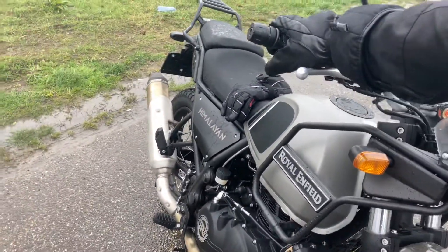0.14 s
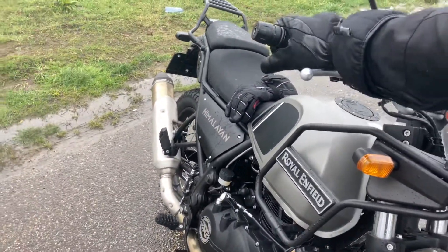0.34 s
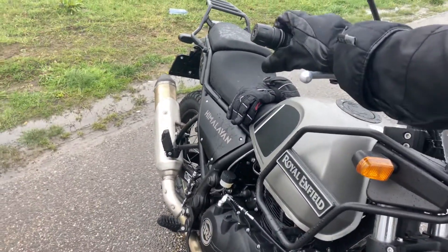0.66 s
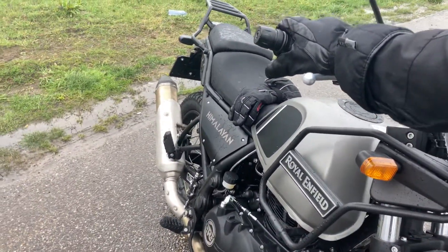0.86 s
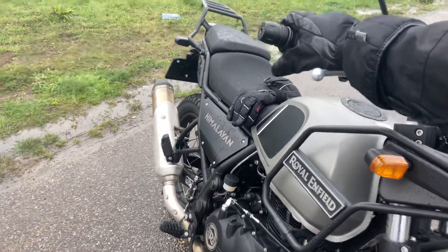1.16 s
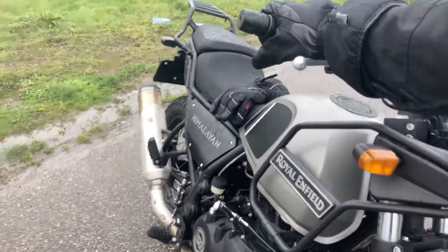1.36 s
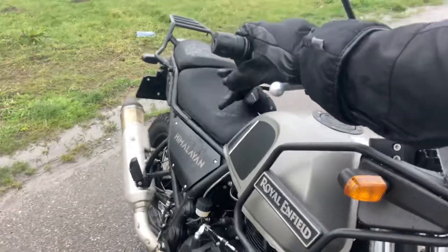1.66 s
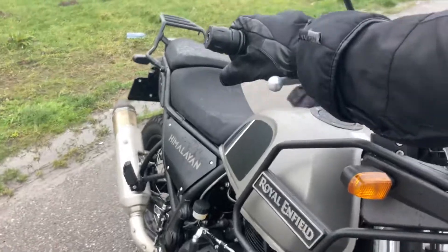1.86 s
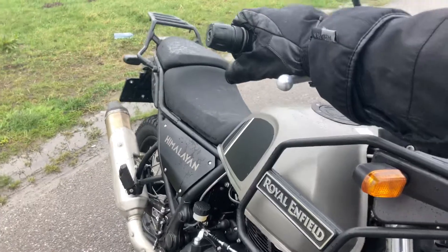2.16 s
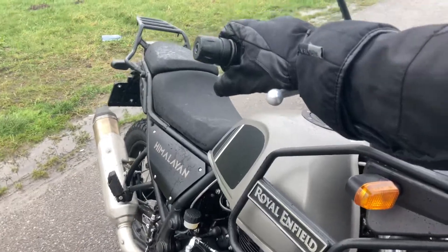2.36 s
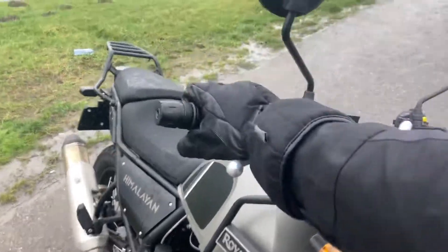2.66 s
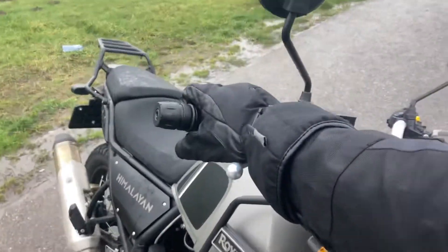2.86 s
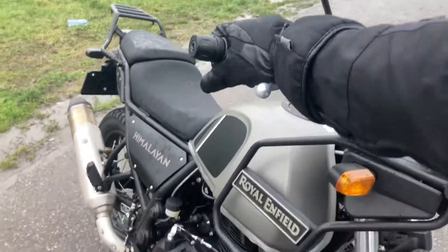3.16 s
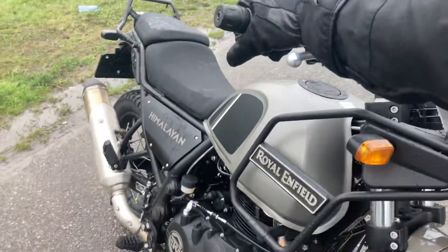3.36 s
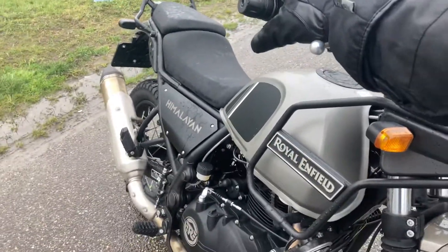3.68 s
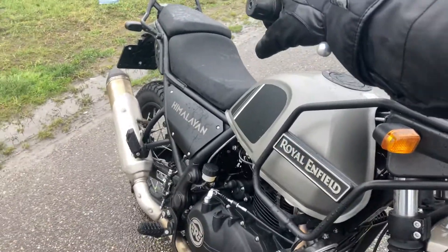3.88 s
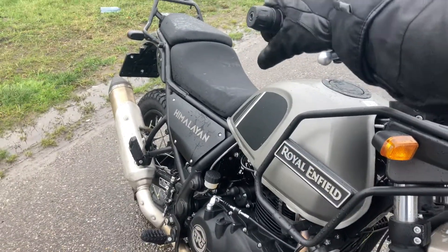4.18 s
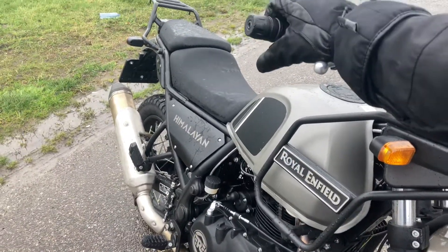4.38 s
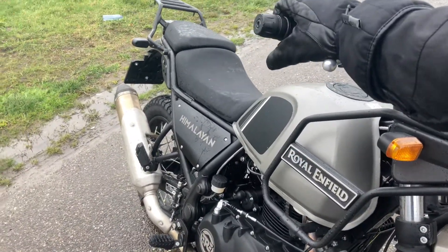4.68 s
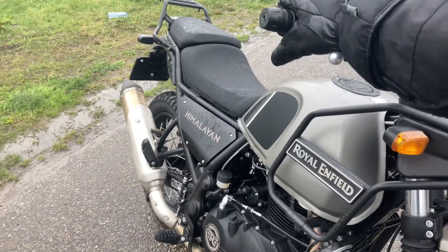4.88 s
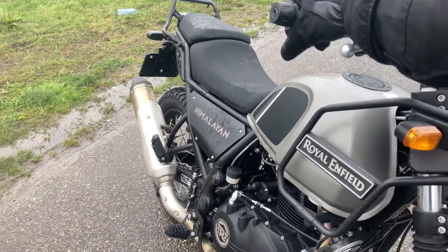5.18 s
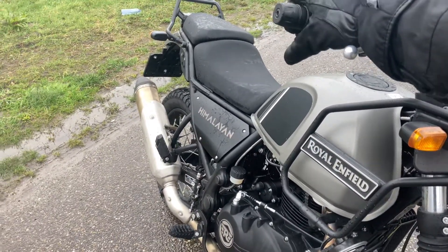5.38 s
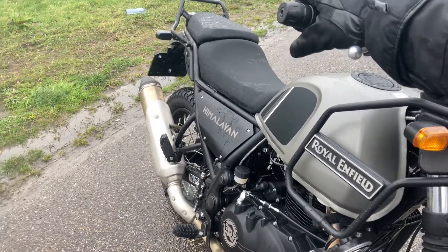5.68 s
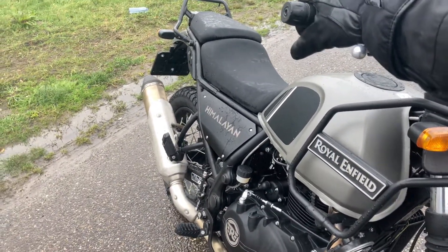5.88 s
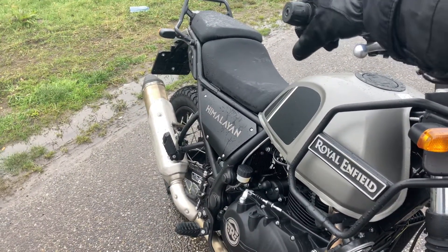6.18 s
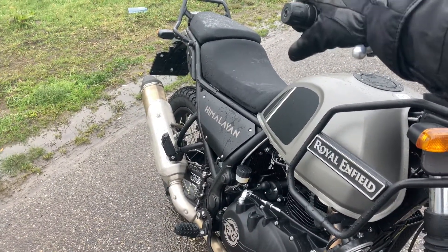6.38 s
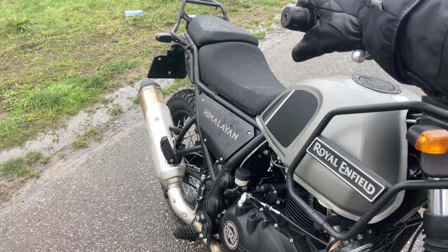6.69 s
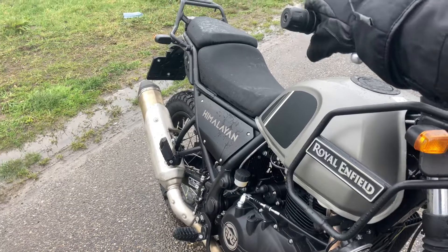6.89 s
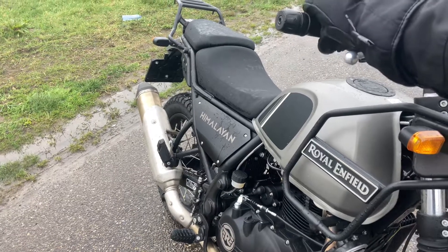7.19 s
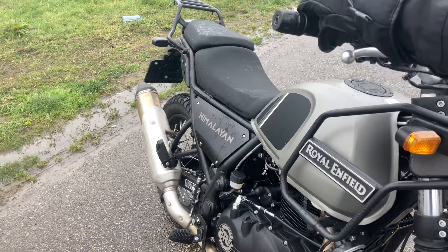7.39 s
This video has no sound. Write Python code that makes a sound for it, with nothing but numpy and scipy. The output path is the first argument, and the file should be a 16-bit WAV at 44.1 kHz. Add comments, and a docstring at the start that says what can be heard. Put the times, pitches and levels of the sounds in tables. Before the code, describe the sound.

Outdoors, close to a single-cylinder motorcycle, an engine thumps and clatters after an opening throttle blip. Strong wind thuds, tears and crackles on the microphone for about three seconds. Then the engine stands clear: five more blips, each a quick swelling growl with an intake honk, falling back to a lumpy beat with hollow exhaust pops, metallic knocks and weak later gusts.

```python
"""Single-cylinder motorcycle blipped in gusty wind

A motorcycle idles close to a stereo microphone, and its throttle is blipped six times.
Gas pulses beat in the silencer and ring the header pipe; the intake honks under throttle.
Filtered noise gated by the engine cycle makes the valve train clack and rasp; short bursts make pops.
Wind thuds, tears and crackles at the microphone for some three seconds, then returns in weaker gusts."""
import sys
import numpy as np
from scipy import signal
from scipy.fft import rfft, irfft
from scipy.io import wavfile
from scipy.ndimage import uniform_filter1d

SR = 44100
rng = np.random.default_rng(int(sys.argv[2]) if len(sys.argv) > 2 else 0)


def output_pcm(signal):
    """Save a mono or channel-first signal as 16-bit PCM at the path in sys.argv[1].

    Samples are clipped to [-1, 1] before scaling.
    """
    pcm = np.clip(np.atleast_2d(signal).T, -1, 1) * 32767
    wavfile.write(sys.argv[1], SR, np.round(pcm).astype(np.int16))


N = 332514
TIME, BINS = np.arange(N) / SR, np.fft.rfftfreq(N, 1 / SR)

# Blips of the throttle. Each row: start in seconds, length of the opening in seconds, firing rate
# pushed in before friction in Hz, relative intake draw in dB, force of the exhaust beat in dB.
BLIPS = [(.303, .29, 21.05, -2, 1), (3.081, 0.48, 29.36, -7, -6), (3.8821, 0.4, 24.24, -7, -3),
         (4.9617, 0.46, 27.66, -5, 0), (5.859, .5134, 26.34, -4, 0), (7.1189, 0.59, 28.5, -6.5, 0.5)]
# Mechanical knocks in one four-stroke cycle. Each row: place in cycles, spread in cycles,
# relative level on the cases in dB, relative level in the sizzle in dB.
KNOCKS = [(-.15, .1, -24, -16), (0, .05, -42, -16), (.43, 0.027, -12, -39)]
# Resonances of the engine cases. Each row: frequency in Hz, width in Hz, peak in dB.
CASE_MODES = [(1017, 77, 13.5), (1295, 30, 14.5), (1442, 52, 15), (1760, 34, 15), (1904, 40, 1),
              (3300, 61, 10.5), (7360, 110, 6.5), (9750, 330, 7)]
# Spectrum of the bright rasp. Each row: frequency in Hz, relative level in dB.
SIZZLE_SPECTRUM = [(1000, -6), (3000, 10), (5000, -1), (5700, 3.5), (6200, 3.5), (6600, -8.5), (7250, 3),
                   (8000, 2.5), (9700, 1), (10800, 3.5), (12000, 0.5), (14200, 1.5), (16000, -12)]
# Wind at the two microphone ports. Each row: frequency in Hz, coherence from 0 to 1,
# phase by which left leads in radians, left over right in dB.
WIND_PORTS = [(0, 0.46, 0, 14.5), (278, 0.99, 0, -5), (450, 0.7, 0.004, 1), (650, 0.021, 0, -1),
              (1090, 0.046, 0, 0.5), (2460, 0.22, 0.0043, -2.5), (5000, 0.037, 0, -0.5)]


def gain_of(db):
    """Level: an amplitude ratio is ten to the power of decibels over twenty."""
    return 10 ** (np.asarray(db) / 20)


def evened(x):
    """Normalization: scales a signal to rms 1."""
    return x / np.sqrt(np.mean(x ** 2) + 1e-20)


def curve(rows, at=TIME):
    """Linear interpolation: joins table rows by straight lines, one array a column."""
    key, *columns = np.transpose(rows)
    return [np.interp(at, key, c) for c in columns]


def colour(x, points, modes=(), size=16384):
    """Minimum phase: a causal filter follows from its magnitude spectrum by way of the cepstrum."""
    bins = np.fft.rfftfreq(size, 1 / SR)
    hz, db = np.transpose(points)
    db = np.interp(np.log(bins + 1), np.log(hz), db)
    for centre, width, peak_db in modes:
        db = db + peak_db / (1 + (2 * (bins - centre) / width) ** 2)
    cepstrum = irfft(np.log(gain_of(db)), size)
    # folding the second half onto the first makes the filter causal
    cepstrum[1:size // 2] *= 2
    cepstrum[size // 2 + 1:] = 0
    ring = irfft(np.exp(rfft(cepstrum)), size)[:size // 2]
    return signal.oaconvolve(np.atleast_2d(x), ring[None])[:, :N].reshape(x.shape)


def wander(hz, size=32768):
    """Band-limited fluctuation: smooth noise of rms 1 whose spectrum fades around hz."""
    step = N / SR / size
    fade = np.exp(-(np.fft.rfftfreq(size, step) / hz) ** 2)
    slow = irfft(rfft(rng.standard_normal(size)) * fade, size)
    return np.interp(TIME, np.arange(size) * step, evened(slow))


def noise():
    """Incoherence: two unrelated white noises."""
    return rng.standard_normal((2, N))


def ports(pair, table):
    """Coherence: blends two signals into partly alike left and right ports."""
    same, lead, tilt_db = curve(table, BINS)
    same = np.clip(same, 0, 1)
    a, b = rfft(pair)
    right = (same * a + np.sqrt(1 - same ** 2) * b) * np.exp(-1j * lead)
    return irfft(np.array([a * gain_of(tilt_db / 2), right * gain_of(-tilt_db / 2)]), N)


def bursts(rows, rise, decay):
    """Transient envelope: a fast rise and exponential decay (both s) for each row (s, peak dB)."""
    envelope = np.zeros(N)
    age = np.arange(SR // 4) / SR
    shape = (1 - np.exp(-age / rise)) * np.exp(-age / decay)
    for s, db in rows:
        part = envelope[round(s * SR):][:len(age)]
        part += gain_of(db) * shape[:len(part)] / shape.max()
    return envelope


def window(cycles, place, length):
    """Periodic gating: a Gaussian gate opens once a cycle."""
    return np.exp(-.5 * (((cycles - place + .5) % 1 - .5) / length) ** 2)


def firings(cycles, place, uneven_db):
    """Impulse excitation: one click a cycle, its strength wandering."""
    count = np.floor(cycles - place)
    return np.diff(count, prepend=count[0]) * gain_of(uneven_db * wander(60))


def controls():
    """Flywheel inertia: each throttle opening adds speed and air; friction drags it towards idle."""
    idle_hz, coast_s = 11.522, .8804  # firings per second; time constant of the slowing
    shut_db, draw_per_rev = -19, 1  # air past the shut throttle; dB of draw per dB of speed
    push, draw = np.zeros(N), gain_of(shut_db)
    for start, length, gained_hz, draw_db, _ in BLIPS:
        opening = np.sin(np.pi * np.clip((TIME - start) / length, 0, 1)) ** 2
        push = push + opening * 2 * gained_hz / length
        draw = draw + np.tanh(1.0 * opening) * gain_of(draw_db)
    speed = idle_hz + signal.lfilter([1 / SR], [1, -np.exp(-1 / (SR * coast_s))], push)
    revs_db = 20 * np.log10(speed / speed.mean())
    return speed, revs_db, 20 * np.log10(draw) + draw_per_rev * revs_db


def beat_db():
    """Load: the force of the exhaust beat passes steadily from the end of one blip to the next."""
    return curve([(start + length, force_db) for start, length, _, _, force_db in BLIPS])[0]


def exhaust(cycles, revs_db, throttle_db, db=-23.5, header_db=-33, place=0.014, swell_place=0.451,
            per_rev=0.57, header_per_rev=2.58, duck_db=-5):
    """Pulsed flow: harmonics of the firing rate fill the silencer; rough blow-downs ring the header."""
    # Smooth beat. Each row: multiple of the firing rate, relative level in dB.
    orders = [(1, -13), (2, -8.5), (3, 2), (4, -3), (5, -14)]
    # Silencer and header pipe. Each row: frequency in Hz, relative level in dB.
    silencer_spectrum = [(20, -8), (60, 1), (88, -1.5), (110, 6), (135, 0), (170, -1.5), (230, -8.5),
                         (600, -44)]
    header_spectrum = [(60, -23), (130, -15.5), (165, -2), (205, -9.5), (260, -2.5), (300, 0), (335, -5.5),
                       (380, 2.5), (430, -10), (490, -26), (595, -12.5), (700, -35), (1000, -12.5),
                       (1400, -48), (4000, -70)]
    jitter, rough, uneven_db = .004, .15, 1.4  # cycles; share of noise; strength of the beat in dB
    beat = sum(gain_of(order_db) * np.cos(2 * np.pi * round(k) * (cycles - swell_place))
               for k, order_db in orders)
    drone = evened(colour(beat * gain_of(uneven_db * wander(14)), silencer_spectrum))
    drone = drone * gain_of(db + per_rev * revs_db)
    clicks = evened(firings(cycles + jitter * wander(40), place, uneven_db=3.0))
    hiss = evened(noise()[0] * window(cycles, place + 0.23, 0.13))
    bark = evened(colour(clicks + rough * hiss, header_spectrum))
    bark = bark * gain_of(header_db + header_per_rev * revs_db)
    # an open throttle ducks the exhaust
    opened = np.clip(gain_of(throttle_db) / gain_of(-4), 0, 1)
    return (drone + bark) * gain_of(beat_db() + duck_db * opened)


def roar(cycles, revs_db, db=-37.0, per_rev=3.64, per_beat=2.7, loose=0.82, count=300):
    """Jet noise: gas roars louder with speed, in firing-rate gusts that partly repeat each cycle."""
    alike = rng.standard_normal((2, count))[:, (cycles % 1 * count).astype(int) % count]
    gas = alike + loose * evened(uniform_filter1d(noise(), size=5))
    gas = gas * (window(cycles, 0.62, 0.27) + 0.19)
    # Each row: frequency in Hz, relative level in dB.
    gas_spectrum = [(300, -18.5), (480, -15.5), (600, -3), (800, -1.5), (1030, -3), (1200, -8),
                    (1500, -22), (4000, -20.5)]
    return evened(colour(gas, gas_spectrum)) * gain_of(db + per_rev * revs_db + per_beat * beat_db())


def intake(cycles, throttle_db, db=-19.0, place=-0.025):
    """Cavity resonance: each gulp of air knocks the airbox and rushes past the throttle plate."""
    # Airbox. Each row: frequency in Hz, relative level in dB.
    airbox_spectrum = [(30, -22), (55, -3.5), (78, 3), (120, -15.5), (190, -16.5), (255, -6), (300, 5.5),
                       (345, -11), (395, -1), (500, -16.5), (640, -24), (1020, -18.5), (1300, -62.5),
                       (6000, -93)]
    rough = .35  # share of noise
    gulps = evened(firings(cycles, place, uneven_db=2.0))
    rush = evened(noise() * (window(cycles, place + 0.062, 0.16) + .5))
    return evened(colour(gulps + rough * rush, airbox_spectrum)) * gain_of(db + throttle_db)


def pops(db=-1, fizz=0.019):
    """Afterburning: unburnt fuel goes off in the pipe as a hollow knock with a short puff."""
    # Each row: time in seconds, relative level in dB.
    pop_times = [(3.718, -15.5), (4.379, -11.5), (4.49, -11.5), (4.516, -17), (4.544, -10.5), (4.743, -24),
                 (5.455, -12.5), (5.702, -9.5), (5.827, -9), (6.329, -7.5), (6.454, -4.5)]
    # Each row: frequency in Hz, relative level in dB.
    pop_spectrum = [(60, -16), (200, -9), (320, 8), (400, 1), (550, -25), (1000, -24), (3000, -15),
                    (6000, -22.5), (15000, -92)]
    clicks = np.zeros(N)
    for s, peak_db in pop_times:
        clicks[round(s * SR)] = gain_of(peak_db)
    puffs = fizz * noise() * bursts(pop_times, 0.003, 0.013)
    sound = colour(uniform_filter1d(clicks, size=24) + puffs, pop_spectrum)
    return gain_of(db) * sound * clicks.max() / abs(sound).max()


def gear_teeth(cycles, count=700):
    """Periodic roughness: tiny chain and gear knocks recur at the same places in every cycle."""
    tooth = (cycles % 1 * count).astype(int) % count
    return evened(rng.standard_normal((2, count))[:, tooth] * (np.diff(tooth, prepend=0) != 0))


def fins(x, size=3000):
    """Modal density: the cooling fins add a short ring of decaying noise."""
    decay_s, share = .007, .65
    ring = rng.standard_normal(size) * np.exp(-np.arange(size) / SR / decay_s)
    return x + share * signal.oaconvolve(x, ring[None] / np.linalg.norm(ring))[:, :N]


def clatter(cycles, revs_db, throttle_db, db=-32, per_rev=1.0, per_throttle=0.23, between=1.0):
    """Structure-borne sound: piston, chain and valves excite the cases, more with speed and load."""
    # Engine cases. Each row: frequency in Hz, relative level in dB.
    case_spectrum = [(100, -53), (300, -4.5), (500, -15), (700, -9), (880, 3), (1060, -3.5), (1200, -11.5),
                     (1800, -14.5), (2500, -7), (3400, -11), (5000, -14), (6500, -32), (12000, -35)]
    loose, flicker_db = .55, 1.6  # share of non-repeating rattle; flicker of its level
    gate = between + sum(gain_of(knock_db) * window(cycles, place, length)
                         for place, length, knock_db, _ in KNOCKS)
    knocks = (gear_teeth(cycles) + loose * noise()) * gate * gain_of(flicker_db * wander(74))
    rattle = evened(colour(fins(knocks), case_spectrum, CASE_MODES))
    return rattle * gain_of(db + per_rev * revs_db + per_throttle * throttle_db)


def strokes(cycles, revs_db, db=-35, per_rev=0.59, ring=0.74, slack=0.018):
    """Impact: tappets and piston slap the metal in short clacks of wandering strength, moment and pitch."""
    # Clacks in one cycle. Each row: place in cycles, relative level in dB.
    stroke_places = [(-.02, 0), (.09, -6), (.3, -11), (.5, -9), (.77, -8)]
    # Noise of a clack, then its ringing tones. Each row: frequency in Hz, relative level in dB.
    stroke_spectrum = [(500, -24), (1000, -3), (2300, 0), (3500, -5), (5000, -13), (6500, -28),
                       (12000, -45)]
    stroke_tones = [(1400, -1), (2300, 0.5), (3400, -8.5)]
    uneven_db, detune, decay_s = 2.8, .06, .0035  # detune: share of the pitch
    hits = sum(gain_of(stroke_db) * firings(cycles + slack * wander(32), place, uneven_db)
               for place, stroke_db in stroke_places)
    envelope = signal.lfilter([1], [1, -np.exp(-1 / (SR * decay_s))], hits)
    rings = np.zeros((2, N))
    for hz, ring_db in stroke_tones:
        pitch = hz * (1 + detune * np.array([wander(22), wander(20)]))
        rings += gain_of(ring_db) * np.sin(2 * np.pi * np.cumsum(pitch, axis=1) / SR)
    metal = evened(colour(noise(), stroke_spectrum)) + ring * evened(rings)
    return evened(metal * uniform_filter1d(envelope, size=90)) * gain_of(db + per_rev * revs_db)


def sizzle(cycles, revs_db, throttle_db, db=-34.0, per_rev=1.65, per_throttle=0.18, between=1.0):
    """Modulated noise: valve train and rushing air rasp in step with the cycle, by speed and load."""
    # Each row: time in seconds, relative treble level in dB.
    treble = [(0, 11), (.5, 5.5), (1.27, 6.5), (1.42, -5.5), (1.88, 7.5), (2.2, 1.5), (3.13, 2.5),
              (3.24, 3), (4.8, 3.5), (5.5, 4), (7.54, 5)]
    gate = between + sum(gain_of(knock_db) * window(cycles, place, length)
                         for place, length, _, knock_db in KNOCKS)
    flickering = noise() * gate * gain_of(1.96 * wander(100))
    rasp = evened(colour(flickering, SIZZLE_SPECTRUM, CASE_MODES))
    level_db = db + per_rev * revs_db + per_throttle * throttle_db + curve(treble)[0]
    return rasp * gain_of(level_db)


def clanks(db=1):
    """Damped resonance: a hard knock rings the cases for a moment."""
    # Each row: time in seconds, relative level in dB.
    clank_times = [(4.122, -18.5), (5.182, -21.5), (5.3, -16.5), (6.178, -13.5), (7.404, -21.5),
                   (7.43, -18.5)]
    # Each row: frequency in Hz, relative level in dB.
    clank_spectrum = [(200, -39), (650, 5.5), (1050, 2.5), (1350, 1), (1800, -16), (2400, -8), (6000, -24)]
    metal = evened(colour(noise(), clank_spectrum, [(1022, 130, 8.7)]))
    return gain_of(db) * metal * bursts(clank_times, 0.00082, 0.011)


def ticks(db=-3):
    """Broadband transients: short bright spits of noise."""
    # Each row: time in seconds, relative level in dB.
    tick_times = [(.4409, -19), (.4883, -18), (1.2765, -26), (1.297, -37), (1.308, -22.5), (1.3448, -22),
                  (1.3628, -23), (1.9689, -30), (3.266, -23.5), (3.313, -21.5), (3.353, -19), (3.384, -23),
                  (4.335, -20), (6.14, -24), (6.419, -22), (6.452, -24), (7.413, -26), (7.448, -17.5)]
    return gain_of(db) * evened(colour(noise(), SIZZLE_SPECTRUM)) * bursts(tick_times, 0.00052, 0.0031)


def crackles(db=3, rise=0.00027, decay=0.0043):
    """Overload: short sharp crackles of the microphone under hard gusts, as bursts of filtered noise."""
    # Each row: time in seconds, relative level in dB.
    crackle_times = [(.2852, -17), (.5164, -23), (.557, -24.5), (.62, -38), (1.0555, -26), (1.1693, -17.5),
                     (1.179, -19), (1.2072, -24), (1.221, -16), (1.228, -31), (1.254, -23), (1.2765, -20),
                     (1.2835, -16), (1.2965, -14), (1.3265, -18), (1.3449, -16), (1.3627, -23),
                     (1.779, -26), (1.9013, -15.5), (1.968, -19), (2.082, -22), (2.105, -22), (2.153, -42),
                     (2.232, -26), (2.324, -22), (2.5686, -29), (2.6, -30), (2.6424, -28), (2.796, -42)]
    # Each row: frequency in Hz, relative level in dB.
    crackle_spectrum = [(300, -20), (1000, 12.5), (2400, 4.5), (4300, -3), (6000, -15.5), (9000, -21.5),
                        (16000, -61)]
    return gain_of(db) * evened(colour(noise(), crackle_spectrum)) * bursts(crackle_times, rise, decay)


def buffets(thud_db=-2, slap_db=-6, tear_db=-1, cycles=0.87, sag=0.38):
    """Turbulent pressure: hard eddies thud in a few sinking swings, with a hollow slap and tearing top."""
    # Single buffets. Each row: time in seconds, middle pitch of the thud in Hz,
    # relative level of thud and slap in dB, relative level of the tearing top in dB.
    buffet_rows = [(0.01, 100, -9, -21.5), (0.099, 151, -10, -22), (0.119, 102, -7.5, -34),
                   (0.165, 73, -11, -18.5), (0.192, 158, -3.5, -22), (0.226, 126, -26, -16.5),
                   (0.242, 197, -4, -25), (0.285, 320, -6.5, -11), (0.318, 63, -7.5, -46),
                   (0.379, 95, -9, -20.5), (0.476, 75, -1.5, -12.5), (0.526, 72.4, -28, -21.5),
                   (0.558, 74, -7.5, -44), (0.617, 121, -3, -23), (0.778, 117, -18, -28),
                   (0.822, 104, -11.5, -26), (0.892, 79.5, -11, -23), (0.909, 75, -15, -31),
                   (0.94, 207, -10.5, -21), (1.054, 153, -6.5, -29), (1.104, 211, -2.5, -14.5),
                   (1.126, 72, -1.5, -26), (1.169, 447, -1.5, -23), (1.194, 118, -5, -17),
                   (1.22, 107, -7, -16), (1.317, 277, -21, -9.5), (1.34, 454, -10, -16),
                   (1.361, 67, -13, -10), (1.554, 108, -32, -23.5), (1.743, 90, -11, -42),
                   (1.778, 64, -10, -22), (1.812, 67, -6, -18), (1.905, 94, -5, -13),
                   (1.967, 91.5, -4, -14.5), (2.039, 260, -7, -17.5), (2.086, 115, -5.5, -18),
                   (2.153, 150, -9, -21), (2.175, 100, -8, -19.5), (2.236, 76, -9, -19.5),
                   (2.251, 335, -4, -29), (2.329, 289, -15, -29), (2.526, 138, -9, -24),
                   (2.573, 85, -22, -16.5), (2.598, 340, -10, -19), (2.623, 457, -9.5, -30),
                   (2.67, 65, -10, -24), (2.714, 205, -16, -28), (2.795, 98, -12.5, -40),
                   (2.963, 212, -14, -24), (3.077, 150, -16, -57), (3.67, 185, -20, -45),
                   (3.859, 99, -11.5, -36), (3.883, 142, -17, -42), (3.958, 64.5, -15.5, -34),
                   (4.156, 226, -8, -31), (4.199, 98, -12, -42), (4.282, 98, -19, -42),
                   (6.795, 180, -11.5, -46), (6.842, 117, -14, -45), (6.922, 110, -12.5, -36),
                   (6.935, 106, -14, -42), (6.963, 318, -13.5, -35), (7.011, 78.6, -16, -32),
                   (7.111, 124, -14.5, -34), (7.246, 112, -22, -47)]
    # Slap and tearing top. Each row: frequency in Hz, relative level in dB.
    slap_spectrum = [(100, -22), (230, 5.5), (350, 5), (560, 1), (800, -8), (2000, -50)]
    tear_spectrum = [(200, 5), (600, -2), (1000, 9), (1600, 5.5), (2400, -2.5), (3300, -13), (4500, -15.5),
                     (6000, -28), (9000, -29), (16000, -44)]
    thuds, age = np.zeros(N), np.arange(SR // 6) / SR
    for (s, hz, db, _), phase in zip(buffet_rows, rng.random(len(buffet_rows))):
        swell = age * hz / cycles  # reaches 1 at the loudest moment
        swings = np.cumsum(hz * (1 + sag * (np.exp(-swell / 2) - .5))) / SR
        thud = gain_of(db + thud_db) * swell * np.exp(1 - swell) * np.sin(2 * np.pi * (swings + phase))
        part = thuds[round(s * SR):][:len(age)]
        part += thud[:len(part)]
    tops = [(s, db + tear_db) for s, _, _, db in buffet_rows]
    slaps = [(s, db + slap_db) for s, _, db, _ in buffet_rows]
    torn = noise() * gain_of(5.1 * wander(900))
    tear = evened(colour(torn, tear_spectrum)) * bursts(tops, 0.00067, 0.017)
    slap = evened(colour(noise(), slap_spectrum)) * bursts(slaps, 0.00028, 0.013)
    return thuds + ports(slap + tear + crackles(), WIND_PORTS)


def gusting(calm_flutter_db=-12, flutter_per_db=1.02, size=8192):
    """Energy summation: gusts rise, hold and die away, adding in power to the breeze."""
    # Each row: start in seconds, length in seconds, relative rumble in dB, relative flutter in dB.
    gust_rows = [(-.03, 0.095, -14.5, -30.5), (0.109, 0.16, -9, -21), (0.436, 0.083, -9.5, -19),
                 (0.875, 0.23, -12.5, -25), (1.124, 0.18, -7.5, -18.5), (1.264, 0.18, -13, -17),
                 (1.784, 0.11, -13, -14), (2.133, 0.076, -17, -23), (2.23, 0.018, -8.5, -31),
                 (2.415, 0.079, -13.5, -23.5), (2.488, .08, -15, -21.5), (2.558, 0.086, -11.5, -19.5),
                 (3.607, 0.094, -24, -35), (4.052, 0.25, -18, -30.5), (6.815, 0.12, -17, -30.5),
                 (7.03, 0.16, -29, -55)]
    # Breeze between gusts. Each row: time in seconds, relative level in dB.
    breeze_rows = [(0, -17.5), (.65, -15), (1.05, -21), (1.7, -14), (2.6, -17), (3.05, -19), (3.3, -25.5),
                   (5.1, -28.5), (5.5, -26.5), (6.5, -25), (7.54, -27.5)]
    attack_s, release_s = 0.012, 0.065
    t = np.linspace(0, N / SR, size)
    breeze_db = curve(breeze_rows, t)[0]
    low, high = gain_of(breeze_db), gain_of(calm_flutter_db + flutter_per_db * breeze_db)
    for start, length, rumble_db, flutter_db in gust_rows:
        age = t - start
        shape = np.clip(age / attack_s, 0, 1) * np.exp(-np.maximum(age - length, 0) / release_s)
        low = np.hypot(low, shape * gain_of(rumble_db))
        high = np.hypot(high, shape * gain_of(flutter_db))
    return np.interp(TIME, t, low), np.interp(TIME, t, high)


def wind(rumble_db=-3, flutter_db=-1, lumpy_db=1.7, torn_db=1.0, ragged_db=3):
    """Turbulence: eddies strike the ports as a lumpy rumble and a flutter torn into shreds."""
    # Rumble and flutter. Each row: frequency in Hz, relative level in dB.
    rumble_spectrum = [(15, -44), (30, -33), (45, -4.5), (65, -3), (95, -3), (130, -4.5), (200, -8),
                       (300, -13), (500, -18.5), (1000, -76.5)]
    flutter_spectrum = [(60, -16), (150, 0.5), (300, 0.5), (450, 1), (600, 2.5), (750, -2), (1020, -2),
                        (1500, -7.5), (2300, -15.5), (3300, -23.5), (5000, -39.5), (8000, -42),
                        (16000, -113)]
    low, high = gusting()
    eddies = evened(gain_of(lumpy_db * wander(60.0)))
    rumble = evened(colour(noise() * eddies, rumble_spectrum)) * gain_of(rumble_db) * low
    shreds = noise() * eddies * gain_of(torn_db * wander(150) + ragged_db * wander(170))
    return rumble + evened(colour(shreds, flutter_spectrum)) * gain_of(flutter_db) * high


def scene(unsteady=0.00084):
    """Superposition: speed and throttle drive every part of the engine; the wind blows over it."""
    # Timing of the firings. Each row: time in seconds, lag in cycles.
    firing_lag = [(3.1, -.15), (3.35, .18), (3.53, .43), (3.88, .37), (4.15, 0), (4.3, .15), (4.6, .05),
                  (4.95, .2), (5.17, .12), (5.4, .27), (5.9, .17), (6.24, -.05), (6.42, .09), (6.75, .08),
                  (7.2, 0), (7.54, .42)]
    # The microphone nears the cylinder. Each row: time in seconds, gain of mechanical noise in dB.
    nearness = [(3.6, -6), (7, -4.5)]
    # Engine at the two ports. Each row: frequency in Hz, coherence from 0 to 1,
    # phase by which left leads in radians, left over right in dB.
    engine_ports = [(0, 0.63, -1, 7), (330, 0.57, -3, 24), (708, 1, 1.5, -0.5), (1118, 0.85, -1.5, -3),
                    (1990, 0.036, -0.33, 0.5), (2910, 0.67, -2.5, -0.5), (4670, 0.17, -5, 1),
                    (5160, 0.96, -5, 0.5), (7430, 1, 0, -2), (7300, 1, -2, 0.5), (14830, 1, 13.5, -0.5)]
    first_cycle = .23  # place in the cycle before lag and unsteadiness
    speed, revs_db, throttle_db = controls()
    cycles = first_cycle + np.cumsum(speed) / SR - curve(firing_lag)[0]
    cycles = cycles + unsteady * wander(19)  # the timing of the cycles wavers
    running = clatter(cycles, revs_db, throttle_db) + strokes(cycles, revs_db)
    running = running + roar(cycles, revs_db) + sizzle(cycles, revs_db, throttle_db)
    bright = running * gain_of(curve(nearness)[0]) + ticks() + clanks()
    deep = exhaust(cycles, revs_db, throttle_db) + intake(cycles, throttle_db) + pops()
    return deep + ports(bright, engine_ports) + ports(wind(), WIND_PORTS) + buffets()


def narrow_bass(x, slip_db=-1, octaves=0.38, order=6, size=2048):
    """Mid and side: below a sinking corner both channels are alike; around it they slip out of phase."""
    mono_hz, sink_from_s, sink_hz_per_s, lowest_hz = 498, 4.04, 149, 29.3
    slip_from_s, slip_rise_s = 5.03, 0.54
    hz, t, (left, right) = signal.stft(x, SR, nperseg=size, noverlap=size * 3 // 4)
    corner = np.clip(mono_hz - sink_hz_per_s * (t - sink_from_s), lowest_hz, mono_hz)
    slip = gain_of(slip_db) * np.clip((t - slip_from_s) / slip_rise_s, 0, 1)
    ratio = (hz[:, None] + 1) / corner
    mid, side = (left + right) / 2, (left - right) / 2
    near_corner = np.exp(-.5 * (np.log2(ratio) / octaves) ** 2)
    side = side / np.sqrt(1 + ratio ** (-2 * order)) + 1j * mid * slip * near_corner
    pair = np.array([mid + side, mid - side])
    return signal.istft(pair, SR, nperseg=size, noverlap=size * 3 // 4)[1][:, :N]


def record(dry, ceiling=.95):
    """Saturation: the bass is narrowed, overload rounds off the peaks and a low-pass limits the band."""
    edge_hz = 15900
    x = narrow_bass(dry)
    rounded = x / (1 + (x / ceiling) ** 6) ** (1 / 6)
    low_pass = signal.firwin(511, edge_hz, window=("kaiser", 9), fs=SR)
    return signal.oaconvolve(rounded, low_pass[None], "same")


dry = scene()
out = record(dry)
output_pcm(out)
```